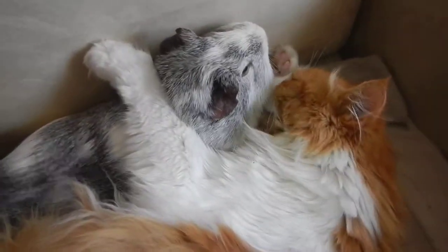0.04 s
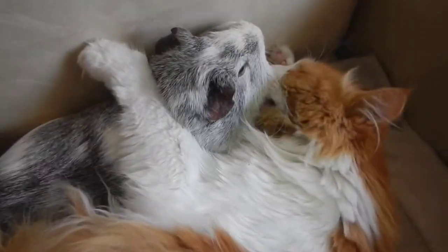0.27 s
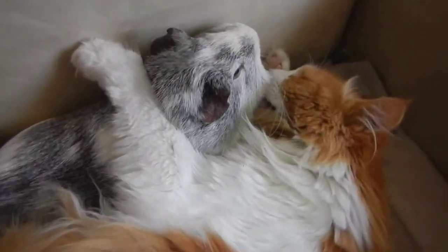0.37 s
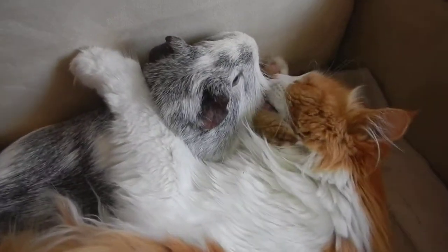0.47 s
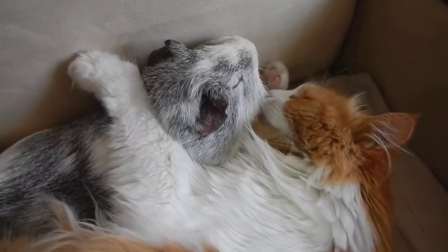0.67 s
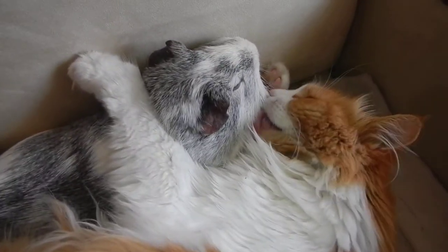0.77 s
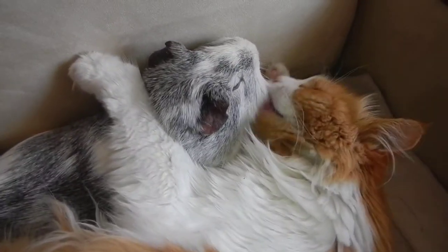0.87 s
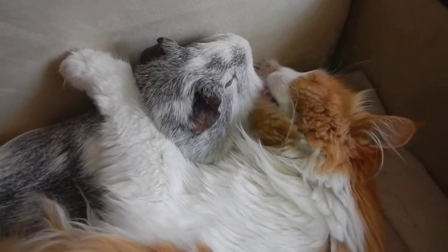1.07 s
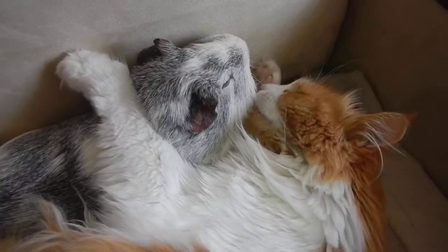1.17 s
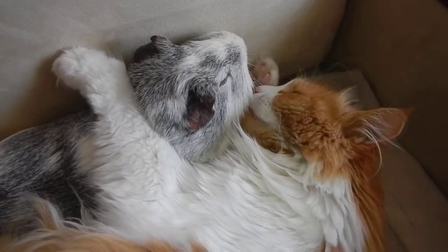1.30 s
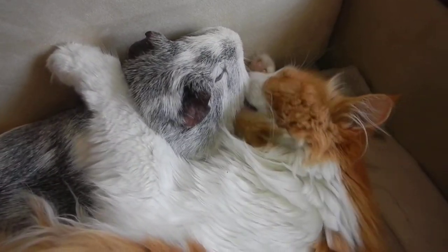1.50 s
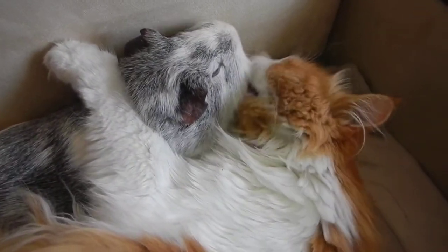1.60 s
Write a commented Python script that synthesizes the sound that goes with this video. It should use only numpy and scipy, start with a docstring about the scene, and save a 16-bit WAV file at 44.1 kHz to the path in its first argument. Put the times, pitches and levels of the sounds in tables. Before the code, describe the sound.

A cat licks another cat close by, starting with tiny wet smacks in the first 0.2 seconds. Two sharp tongue clicks come at about 0.3 and 0.4 seconds, the second louder, with a slight saliva crackle and dull bump. Faint ticks and soft brushes through fur follow until about 1.4 seconds. Quiet room noise and a faint, very high electrical whine continue throughout.

```python
"""Tiny smacks and two sharp wet clicks: a cat licks another cat lying close beside it on a couch.
The lips part with short rings, and the tongue pulls free and sets the hollow of the mouth ringing.
Saliva crackles, the rough tongue brushes fur, and jaw and body make dull bumps.
Behind them are a quiet, steady room noise and a thin electrical whine."""
import sys
import numpy as np
from scipy import signal
from scipy.fft import rfft, irfft
from scipy.io import wavfile

SR = 44100
rng = np.random.default_rng(int(sys.argv[2]) if len(sys.argv) > 2 else 0)


def wav_record(signal):
    """Record a signal, one row per channel, as 16-bit PCM in the file named by sys.argv[1]."""
    frames = np.transpose(np.atleast_2d(signal))
    bounded = np.clip(frames, -1, 1)
    # unit amplitude maps onto the largest positive 16-bit level
    quanta = np.round(bounded * 32767).astype(np.int16)
    wavfile.write(sys.argv[1], SR, quanta)


N = 72765
T = np.arange(N) / SR


def undb(db):
    """Turn decibels into a number to multiply by."""
    return 10 ** (np.asarray(db) / 20)


def pan(db):
    """Left and right gains that make the left side louder by db."""
    return undb(np.array([[db], [-db]]) / 2)


def per_bin(points):
    """Join (Hz, value) points into a curve with a value for every frequency."""
    hz, value = np.array(points, float).T
    return np.interp(np.log(np.maximum(np.fft.rfftfreq(N, 1 / SR), 1)), np.log(hz), value)


def colour(x, spectrum):
    """Shape the lows and highs of x, then scale its average (rms) level to 1."""
    shaped = irfft(rfft(x) * undb(per_bin(spectrum)), N)
    return shaped / np.sqrt(np.mean(shaped ** 2))


def grains(spread):
    """Grainy noise whose strength jumps every 32 samples, partly shared by both sides."""
    size = np.exp(spread * np.repeat(rng.uniform(-1.7, 1.7, N // 32 + 1), 32)[:N])
    return size * (rng.standard_normal((2, N)) + rng.standard_normal(N))


def swell(start, rise_ms):
    """A quick rise to 1, then a fade."""
    age = np.maximum(T - start, 0) * 1000 / rise_ms
    return age * np.exp(1 - np.minimum(age, 80))


def ring(start, hz, rise_ms):
    """A tone that swells and dies away almost at once."""
    return swell(start, rise_ms) * np.sin(2 * np.pi * hz * (T - start))


def clicks():
    """The tongue pulls free and rings the mouth, whose shape sets how strong each tone is."""
    # Each row: start in seconds, level in dB, extra dB for the deep, middle, bright and snap tones,
    # pitch factor, left over right in dB, ring length factor.
    releases = [(0.3083, -23.5, -6, 3, -13.5, -1, 1.015, -1.7, 0.77),
                (0.3684, -20, 1, -2.1, 0.3, 2, 0.972, -1, 1), (0.3758, -42, -2, -3, -1, 12, 1.3, -7, 0.75),
                (0.383, -29, 0, -5.2, -3.1, 2, 0.926, -1, 0.86)]
    # The mouth's tones: deep, middle, bright, then three for the snap.
    # Each row: pitch in Hz, rise time in ms, level in dB, left over right in dB.
    mouth_tones = [(1713, 0.79, -0.5, 5), (2146, .47, 0.5, 5.5), (3370, 0.31, -1.25, -5),
                   (5500, 0.42, -16, -0.5), (7940, 0.22, -16, 3), (9840, 0.077, -9, 8.5)]
    out = np.zeros((2, N))
    for start, db, deep, middle, bright, snap, pitch, side, length in releases:
        mouth_shape = (deep, middle, bright, snap, snap, snap)
        for (hz, rise_ms, tone_db, tone_side), shape_db in zip(mouth_tones, mouth_shape):
            gain = undb(db + tone_db + shape_db) * pan(side + tone_side)
            out += gain * ring(start, hz * pitch, rise_ms * length)
    return out


def smacks():
    """Lips part with a short ring and a little wet noise; the tongue adds faint, crisp ticks."""
    # Each row: start in seconds, level in dB, pitch in Hz, rise time in ms.
    partings = [(0.0409, -38, 1690, 0.82), (0.0816, -48, 1600, 1.5), (0.1133, -43, 1480, 0.7),
                (0.1168, -49.5, 1580, .7), (0.175, -42, 1670, 0.51), (0.1784, -44.5, 1400, 0.69),
                (0.209, -40, 1760, 0.64), (0.21, -50.5, 1540, 0.61), (0.218, -45, 1590, 0.55),
                (0.3405, -54, 3420, 2.4), (0.592, -48.5, 650, 1.6), (0.803, -46, 590, 1.7)]
    # Each row: start of a tongue tick in seconds, level in dB.
    ticks = [(0.480, -52), (0.667, -55.5), (1.346, -53.5)]
    wet = colour(grains(0.11), [(200, -6), (700, 7.5), (1700, -3), (3000, -14), (6000, -23), (15000, -40)])
    crack = colour(grains(0.2), [(1000, -20), (4000, 6), (11000, 10), (15000, -18)])
    lips = 0
    for start, db, hz, rise_ms in partings:
        wet_burst = undb(-6.5) * swell(start, rise_ms=1.8) * wet
        lips += undb(db) * (ring(start, hz, rise_ms) + wet_burst)
    return lips + sum(undb(db) * swell(start, rise_ms=0.82) for start, db in ticks) * crack


def saliva():
    """A film of saliva crackles as it stretches and breaks around the loudest click."""
    # Each row: frequency in Hz, strength of the crackle there in dB.
    crackle_spectrum = [(100, -12), (400, 6), (900, -1.5), (1500, 2.5), (2500, -4), (3600, -5), (4800, -14),
                        (8000, -14), (11000, -14), (15000, -19)]
    start_s, peak_s, end_s = 0.33, 0.379, 0.4065
    stretch = np.interp(T, [start_s, peak_s, end_s], [0, 1, 0]) ** 1.23
    return undb(-41) * stretch * colour(grains(0.1), crackle_spectrum)


def bumps():
    """Jaw and body make brief, dull bumps, each with a weaker knock an octave higher."""
    # Each row: middle in seconds, level in dB, pitch in Hz, half length in seconds.
    movements = [(0.311, -53, 70, 0.004), (0.373, -36, 108, 0.0021), (0.385, -49, 112, 0.01),
                 (1.29, -61, 90, .02), (1.39, -53, 132, 0.013)]
    out = 0
    for middle, db, hz, half_length in movements:
        phase = 2 * np.pi * hz * (T - middle)
        age = (T - middle) / half_length
        thud = np.exp(-abs(age)) * np.cos(phase)
        knock = undb(-10.5) * np.exp(-(2 * age) ** 2) * np.cos(2 * phase)
        out += undb(db) * (thud + knock)
    return out


def licks():
    """The rough tongue brushes through fur, louder as it presses harder."""
    # Each row: middle of a stroke in seconds, half length in seconds, level in dB.
    strokes = [(0.114, 0.037, -55), (0.312, 0.016, -51), (0.604, 0.018, -56), (1.004, 0.035, -54),
               (1.084, 0.05, -58.5)]
    # Each row: frequency in Hz, strength of the brushing there in dB.
    fur_spectrum = [(300, 1), (1000, 2), (2000, 4.5), (3200, 0), (5000, -5.5), (7000, -10), (11000, -10),
                    (15000, -23)]
    pressure = sum(undb(db) * np.exp(-((T - middle) / half) ** 2) for middle, half, db in strokes)
    return pressure * colour(grains(0.19), fur_spectrum)


def hollow_path(mouth):
    """On its way to the microphone the sound turns hollow and reaches the left side a little later."""
    # Each row: frequency in Hz, boost or cut in dB.
    path_gains = [(100, -13), (600, -0.5), (900, -4), (1250, -0.5), (2000, 1), (2500, 3), (3000, -1),
                  (4200, 5), (4700, -2), (5100, 0), (5650, 3), (6200, -5), (6800, 1), (8100, 3.5),
                  (9000, 1), (11200, 1), (13500, 0)]
    left_lag_s = 0.00003
    left, right = rfft(mouth) * undb(per_bin(path_gains))
    delay = np.exp(-2j * np.pi * np.fft.rfftfreq(N, 1 / SR) * left_lag_s)
    return irfft(np.array([left * delay, right]), N)


def echo(x):
    """A softly furnished room sends back a short, weak echo."""
    # Each row: frequency in Hz, strength of the echo there in dB.
    echo_spectrum = [(100, 8), (1500, -10), (4000, -16), (12000, -16)]
    gap_s, fade_s = 0.002, 0.054
    tail = colour(rng.standard_normal((2, N)), echo_spectrum) * undb(-60 * T / fade_s) * (T > gap_s)
    tail /= np.sqrt(np.sum(tail ** 2, axis=1, keepdims=True))
    return undb(-11) * signal.fftconvolve(x, tail, axes=1)[:, :N]


def room_noise():
    """Steady room noise, partly alike on both sides in the bass and most alike near 1600 Hz."""
    # Each row: frequency in Hz, strength of the noise there in dB.
    room_spectrum = [(15, -46), (25, -29), (44, -18), (85, -4), (140, -5), (240, -10), (300, -10.5),
                     (400, 3), (470, -3), (570, -6), (660, -7.5), (1070, -11.5), (1350, -12), (1500, -6.5),
                     (1630, -2.5), (1800, -9), (2100, -9), (2350, -17.5), (2800, -17.5), (4500, -20.5),
                     (6300, -23.5), (8100, -22), (9200, -25.5), (11200, -23), (14000, -30.5), (15500, -56)]
    # Each row: frequency in Hz, how alike left and right are (0 unrelated, 1 the same).
    likeness = [(60, 0.34), (150, 0.39), (380, 0.033), (800, 0.067), (1600, 0.88), (3000, 0.065),
                (10000, 0.046)]
    alike = per_bin(likeness)
    shared, opposite = rfft(rng.standard_normal((2, N)))
    both = shared * np.sqrt(1 + alike) + opposite * np.sqrt(1 - alike) * np.array([[1], [-1]])
    return undb(-52.5) * pan(0.52) * colour(irfft(both, N), room_spectrum)


def whine():
    """A thin, very high electrical tone whose level wavers slightly."""
    pitch_hz, right_lead_rad = 14835.4, 0.29
    waver = colour(rng.standard_normal((2, N)), [(3, 0), (35, -4), (100, -22), (400, -60), (3000, -100)])
    phase = 2 * np.pi * pitch_hz * T + np.array([[0], [right_lead_rad]])
    return undb(-60) * pan(-2) * np.sqrt(2) * (1 + 0.14 * waver) * np.sin(phase)


def scene():
    """Close mouth sounds and their echo, with bumps and licks, over the quiet room."""
    mouth = hollow_path(clicks() + smacks() + saliva())
    return mouth + echo(mouth) + bumps() + licks() + room_noise() + whine()


def record(dry):
    """The recorder cuts the deepest bass and the highest treble."""
    low_hz, top_hz = 26, 15900
    bass_cut = signal.butter(2, low_hz, "high", fs=SR, output="sos")
    treble_cut = signal.ellip(10, 0.1, 80, top_hz, fs=SR, output="sos")
    return signal.sosfilt(treble_cut, signal.sosfilt(bass_cut, dry))


dry = scene()
out = record(dry)
wav_record(out)
```